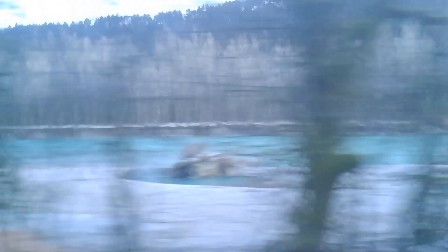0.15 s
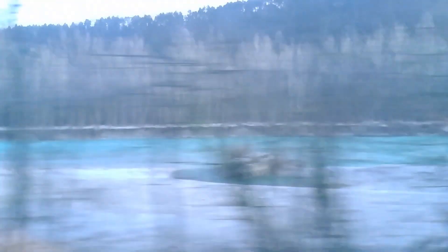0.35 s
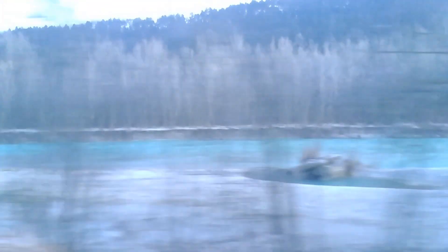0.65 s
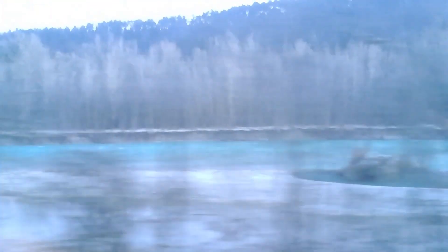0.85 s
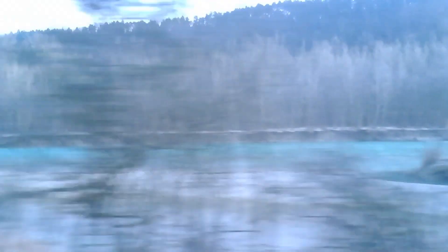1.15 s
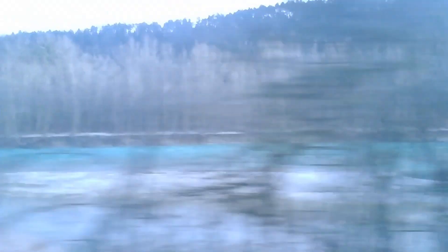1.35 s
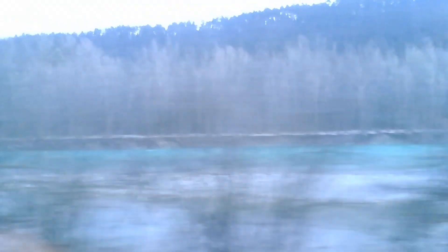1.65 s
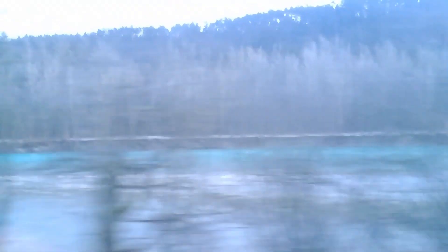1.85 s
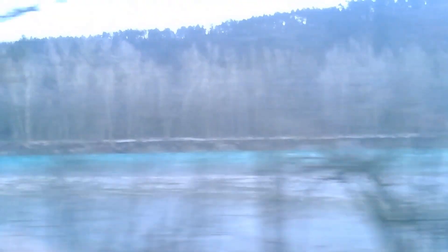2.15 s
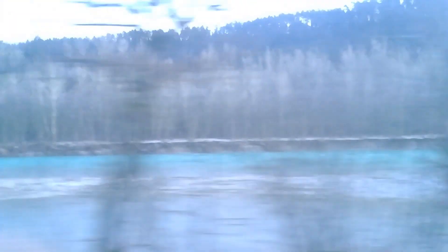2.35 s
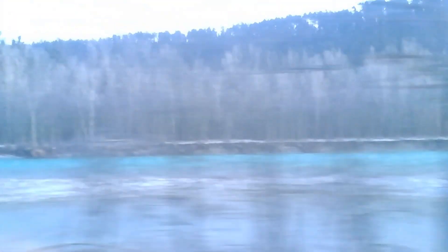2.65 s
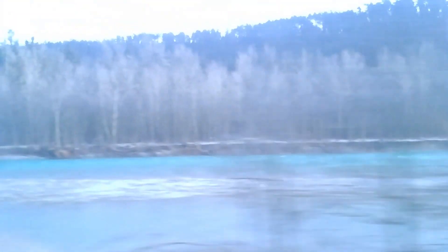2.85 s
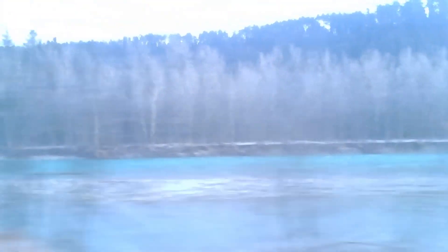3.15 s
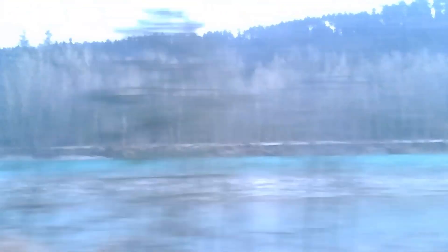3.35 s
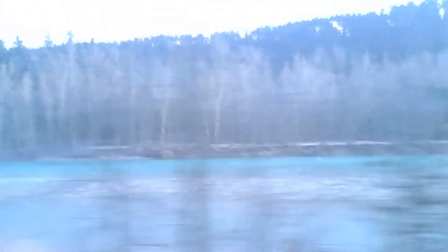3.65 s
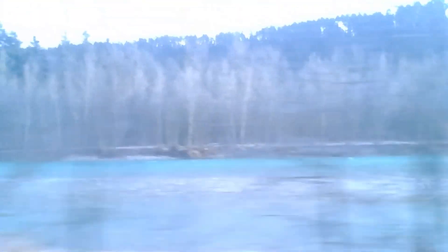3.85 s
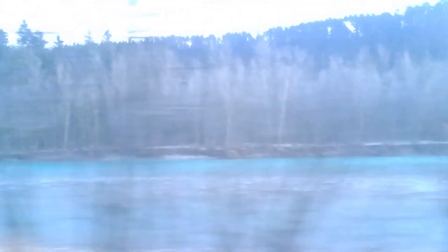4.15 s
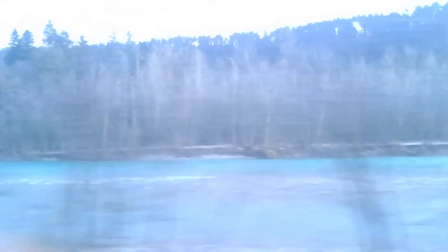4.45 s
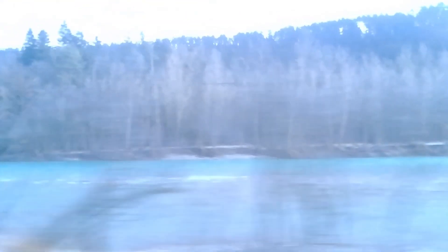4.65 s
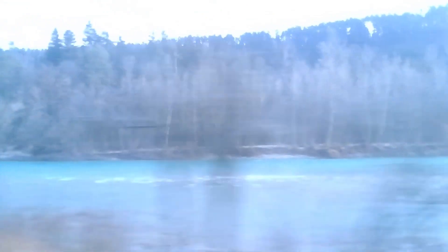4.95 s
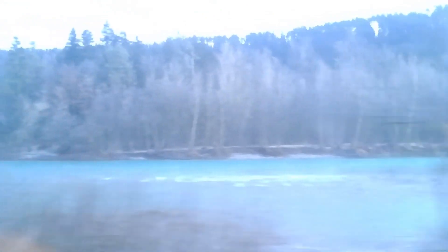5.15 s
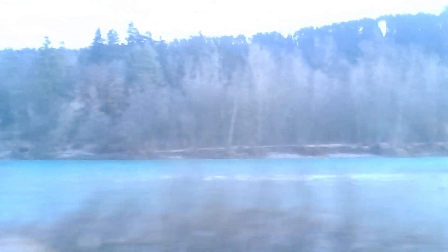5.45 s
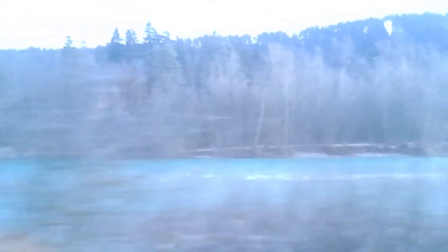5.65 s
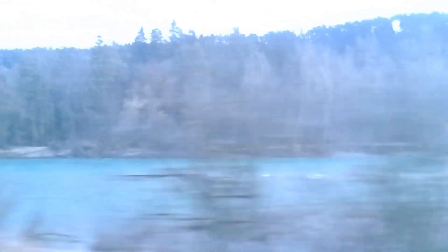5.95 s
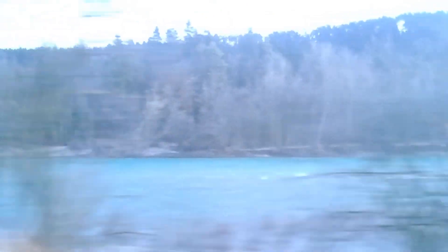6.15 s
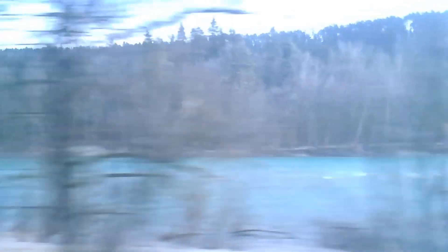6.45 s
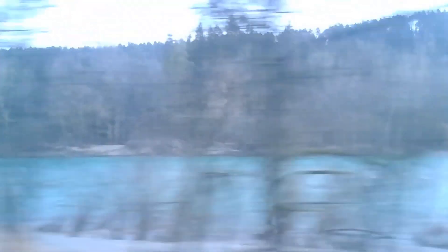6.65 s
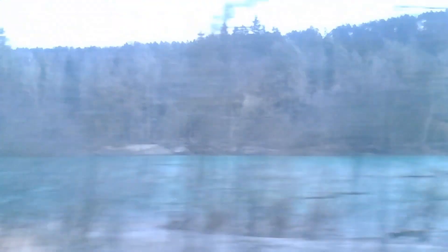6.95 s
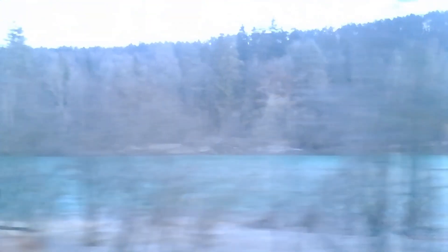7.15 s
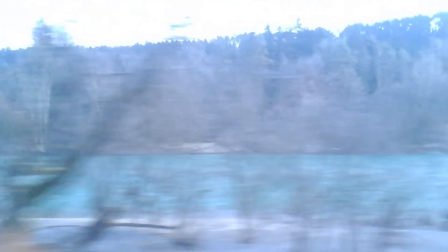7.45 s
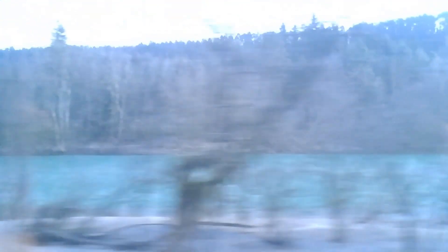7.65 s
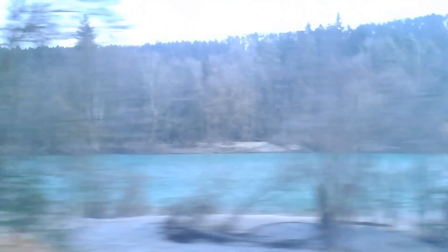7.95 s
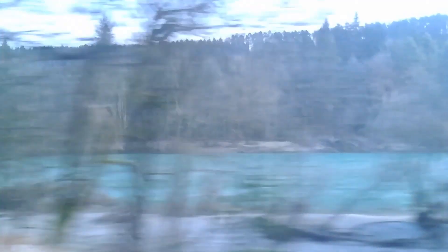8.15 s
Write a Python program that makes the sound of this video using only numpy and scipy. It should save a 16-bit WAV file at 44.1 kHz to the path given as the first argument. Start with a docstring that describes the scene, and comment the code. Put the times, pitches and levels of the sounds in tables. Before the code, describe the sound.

Carriage interior at speed, microphone in the cabin near a window. Bass-heavy continuous hum dominates, slowly beating, with a thin wavering whine that weakens as the train eases off. Gusty air is faint. Dull panel clacks and a tiny metallic rattle pass. Late on, the boom nearly vanishes and partly returns under rougher, fuller rolling noise and engine drone.

```python
"""A carriage boom inside a running train, from out-of-round wheels, beats against an engine drone.
It fades after five seconds and partly returns; wheel-locked tones sink slightly as the train eases off.
Coloured noise makes the rolling roar and rushing air, which swell on rougher track towards the end.
Sine tones make a faint whine, rail singing and panel hums; resonant noise makes two thuds from the track.
Short noise bursts make clacks, rustles and ticks; decaying sines make the knocks of a loose fitting."""
import sys
import numpy as np
from scipy import signal
from scipy.fft import rfft, irfft, next_fast_len
from scipy.io import wavfile
from scipy.ndimage import uniform_filter1d

SR = 44100
rng = np.random.default_rng(int(sys.argv[2]) if len(sys.argv) > 2 else 0)


def unload_wav(signal):
    """Save mono or channel-first audio to the path in sys.argv[1] as 16-bit WAV at rate SR, clipped to [-1, 1]."""
    wavfile.write(
        sys.argv[1],
        SR,
        np.round(np.clip(np.atleast_2d(signal).T, -1, 1) * 32767).astype(np.int16),
    )


N = 365148
TIME = np.arange(N) / SR
CRUISE_TURNS_PER_S = 13.1
ROUGH_FROM_S, ROUGH_FULL_S = 6.05, 6.83


def from_db(db):
    """Decibels to amplitude gain."""
    return 10 ** (np.asarray(db) / 20)


def rms_one(x):
    """Scale to unit power."""
    return x / np.sqrt(np.mean(x ** 2) + 1e-20)


def curve_db(rows):
    """Interpolate (time_s, level_db) rows at every sample."""
    time_s, level_db = np.transpose(rows)
    return np.interp(TIME, time_s, level_db)


def at_hz(points, hz):
    """Interpolate a table on a log-frequency axis."""
    point_hz, value = np.transpose(points)
    return np.interp(np.log(hz), np.log(point_hz), value)


def ramp(start_s, end_s):
    """Linear rise from 0 to 1 between two times."""
    return np.clip((TIME - start_s) / (end_s - start_s), 0, 1)


def bell(center_s, peak_db, sigma_s):
    """Gaussian amplitude envelope."""
    return from_db(peak_db) * np.exp(-0.5 * ((TIME - center_s) / sigma_s) ** 2)


def swells(rows):
    """Sum of bells, one per row."""
    return sum(bell(center_s, peak_db, sigma_s) for center_s, peak_db, sigma_s in rows)


def strikes(rows, attack_s, decay_s):
    """Sum of envelopes: linear attack times exponential decay, one per row."""
    total = 0
    for start_s, level_db in rows:
        attack = np.clip((TIME - start_s) / attack_s, 0, 1)
        decay = np.exp(-np.abs(TIME - start_s) / decay_s)
        total = total + from_db(level_db) * attack * decay
    return total


def drift(rate_hz):
    """Slow unit-power random signal: noise through two equal low-pass poles."""
    step = 40  # computed at SR / 40, then interpolated
    pole = np.exp(-2 * np.pi * rate_hz * step / SR)
    noise = rng.standard_normal(N // step + 2002)
    slow = signal.lfilter([1], [1, -2 * pole, pole * pole], noise)[2000:]  # drop the settling
    return np.interp(np.arange(N) / step, np.arange(len(slow)), rms_one(slow))


def tone(cycles, wander_rad, rate_hz):
    """Unit-power sine on a running cycle count, with random start phase and wandering phase."""
    phase = 2 * np.pi * (cycles + rng.random()) + wander_rad * drift(rate_hz)
    return np.sqrt(2) * np.sin(phase)


def cabin_noise(spectrum):
    """Unit-power stereo noise of a given colour, its sides alike mainly in the bass."""
    # left-right likeness of the diffuse field: frequency_hz, correlation (-1 to 1)
    likeness = [(60, 0.9), (150, 1), (250, 0.79), (500, .52), (1000, -.03), (2000, -0.035), (4000, .12),
                (8000, -0.13)]
    size = next_fast_len(N)
    hz = np.maximum(np.fft.rfftfreq(size, 1 / SR), 1)
    mid, side = rfft(rng.standard_normal((2, size)))
    alike = at_hz(likeness, hz)
    both = np.sqrt(1 + alike) * mid + np.sqrt(1 - alike) * side * [[1], [-1]]
    # skirts beyond the ends of the table
    low_skirt = np.minimum(1, hz / spectrum[0][0]) ** 2
    high_skirt = np.minimum(1, spectrum[-1][0] / hz) ** 4
    shaped = both * low_skirt * high_skirt * from_db(at_hz(spectrum, hz))
    return rms_one(irfft(shaped, size)[:, :N])


def resonant_noise(modes):
    """Noise through parallel resonances, each applied twice for steep skirts."""
    shake = rng.standard_normal(N)
    total = 0
    for hz, width_hz, level_db in modes:
        b, a = signal.iirpeak(hz, hz / width_hz, fs=SR)
        once = signal.lfilter(b, a, shake)
        total = total + from_db(level_db) * rms_one(signal.lfilter(b, a, once))
    return total


def wheels(turns, rough, eased):
    """Tread bumps repeat every turn; order 5 meets the body boom, throbbing once a turn at cruise."""
    # boom of the carriage body: time_s, level_db
    boom_curve = [(0, -15), (2.9, -15), (4.7, -13.5), (5.15, -16.5), (5.38, -24), (5.75, -22), (6.3, -29.5),
                  (6.85, -48.5), (7.35, -27.5), (8.28, -24)]
    # weaker wheel orders: multiple of the turning rate, smooth_track_db, rough_track_db
    wheel_orders = [(2, -47, -51), (3, -40.5, -39.5), (4, -44.5, -40.5), (6, -36, -29), (8, -50.5, -38.5),
                    (9, -54.5, -42), (10, -53.5, -45), (11, -53.5, -50)]
    boom_order, throb_depth, waver_db = 5, 0.22, 1.4
    throb = 1 + throb_depth * (1 - eased) * np.sin(2 * np.pi * turns)
    boom = tone(boom_order * turns, wander_rad=0.025, rate_hz=4.4)
    total = from_db(curve_db(boom_curve)) * throb * boom
    for order, smooth_db, rough_db in wheel_orders:
        level_db = smooth_db + rough * (rough_db - smooth_db) + waver_db * drift(0.98)
        total = total + from_db(level_db) * tone(order * turns, wander_rad=0.59, rate_hz=0.94)
    return total


def rolling(turns, rough):
    """Rail roughness shakes the floor and roars through it, throbbing slightly once a wheel turn."""
    # low shaking of the floor: frequency_hz, relative density_db
    rumble_spectrum = [(18, -29), (30, -14), (42, -8.5), (60, -1), (76, 4), (90, -8), (115, -1), (140, -2),
                       (178, -0.5), (215, -3.5), (240, -14), (300, -30.5)]
    # roar through the floor: frequency_hz, relative density_db
    roar_spectrum = [(170, -25), (245, -7), (290, -1.5), (335, 1), (385, -5.5), (440, -11), (510, -11),
                     (570, -9), (640, -11), (730, -14), (820, -19), (1000, -22.5), (1400, -40.5)]
    throb = 1 + 0.075 * np.sin(2 * np.pi * turns)
    rumble_db = -32.0 + 3.6 * rough + 1.1 * drift(8.9)
    roar_db = -41 + 4.5 * rough
    rumble = from_db(rumble_db) * cabin_noise(rumble_spectrum)
    roar = from_db(roar_db) * cabin_noise(roar_spectrum)
    return throb * (rumble + roar)


def engine():
    """Eight firings a cycle drone; uneven cylinders add a comb of weaker lines around the firing tone."""
    # orders of the engine: multiple of the cycle rate, level_db at 0 dB load
    engine_orders = [(4.5, -41.5), (8, -28), (15, -51.5), (16, -48.5), (17, -42.5), (18, -47), (19, -36.5),
                     (20, -46), (21, -45), (22, -45.5), (23, -47.5), (24, -54), (34.5, -49)]
    # engine load: time_s, gain_db
    load_curve = [(1, -15), (2, -4.5), (3.6, -4.5), (6, -4), (7.4, 0.5)]
    cycle_hz = 9.635
    cycles = cycle_hz * TIME
    lines = 0
    for order, level_db in engine_orders:
        lines = lines + from_db(level_db) * tone(order * cycles, wander_rad=0.2, rate_hz=1.7)
    return from_db(curve_db(load_curve)) * lines


def air_level_db():
    """Air level: a small rise, then a larger one lagging the rough track."""
    base_db, rise_db, rough_rise_db, rough_lag_s = -58, 2.3, 5.5, 0.57
    rise = rise_db * ramp(4.95, 5.5)
    rough_rise = rough_rise_db * ramp(ROUGH_FROM_S + rough_lag_s, ROUGH_FULL_S + rough_lag_s)
    return base_db + rise + rough_rise


def gust_level_db():
    """Gusts each build, hold and drop away."""
    # gusts along the windows: start_s, length_s, rise_db
    gust_rows = [(-.1, 0.22, 4), (0.753, 0.22, 0.5), (1.265, 0.36, 2), (1.78, 0.19, 2), (2.1, 0.19, 1.5),
                 (2.387, 0.4, 1.5), (2.948, 0.46, 4), (3.39, 0.2, 1.5), (3.6, 0.36, 0.5), (4.14, 0.27, 2.5),
                 (4.52, .13, 2), (5.03, 0.13, 1.5), (5.92, 0.29, 1.2), (6.454, .4, 2.4), (6.996, 0.17, 3)]
    attack_s, release_s = 0.05, 0.04
    total_db = 0
    for start_s, length_s, rise_db in gust_rows:
        end_s = start_s + length_s
        held = ramp(start_s, start_s + attack_s) - ramp(end_s, end_s + release_s)
        total_db = total_db + rise_db * held
    return total_db


def air():
    """Air rushes along the windows, fluttering with turbulence; its hiss leans left."""
    # rush: frequency_hz, relative density_db
    rush_spectrum = [(700, -14), (950, -7), (1150, 4), (1480, -2), (1800, 1), (2000, 3), (2180, 0),
                     (2400, -1.5), (2800, -4.5), (3300, -13.5), (4200, -33)]
    # hiss: frequency_hz, relative density_db
    hiss_spectrum = [(2500, -14), (3400, -5.5), (4400, 0), (5200, -8), (6500, -9.5), (7600, -14.5),
                     (9500, -23), (12000, -16.5), (15500, -19.5)]
    hiss_offset_db, hiss_gust_share, hiss_flutter_db = -13, 0.53, 1.1
    air_db = air_level_db() + 1.1 * drift(43)
    gust_db = gust_level_db()
    hiss_db = air_db + hiss_offset_db + hiss_gust_share * gust_db + hiss_flutter_db * drift(40)
    rush = from_db(air_db + gust_db) * cabin_noise(rush_spectrum)
    hiss = from_db(hiss_db) * cabin_noise(hiss_spectrum)
    return rush * from_db([[0.3], [-0.3]]) + hiss * from_db([[0.9], [-0.9]])


def whine(turns, eased):
    """Thin wavering drive tones sink with speed over a low hum; most fade as the train eases off."""
    # drive tones, each with one added swell:
    # cruise_hz, cruise_db, eased_db, swell_center_s, swell_peak_db, swell_sigma_s
    whine_tones = [(487, -56, -72, .25, -57, .2), (535, -70, -64, 2.1, -62, .25),
                   (581, -63, -68, .6, -62, .25), (625, -61, -59.5, 1.9, -60, .4),
                   (636, -61, -66, 1.65, -59, .34), (680, -59, -70, 1.3, -57, .3),
                   (724, -59.5, -65, .8, -55, .14), (784, -68, -78, 1.3, -70, .3),
                   (835, -75, -70, 5.1, -72, .25), (1152, -70, -74, 2.15, -70, .25)]
    hum_order, hum_db, hum_drop_db, flicker_db = 8, -38, 16, 1.6
    hum = from_db(hum_db - hum_drop_db * eased) * tone(hum_order * turns, wander_rad=0.18, rate_hz=5.3)
    thin = 0
    for cruise_hz, cruise_db, eased_db, center_s, swell_db, sigma_s in whine_tones:
        level_db = cruise_db + eased * (eased_db - cruise_db) + flicker_db * drift(2.2)
        level = from_db(level_db) + bell(center_s, swell_db, sigma_s)
        cycles = cruise_hz * turns / CRUISE_TURNS_PER_S
        thin = thin + level * tone(cycles, wander_rad=0.42, rate_hz=2.3)
    return hum + thin


def rail_singing():
    """A faint, broken high tone of the rail climbs, sinks and dies away."""
    top_s, top_hz, glide_hz_per_s = 2.1, 6860, 280
    start_db, hold_until_s, fade_db_per_s = -87.5, 3.3, 15
    hz = top_hz - glide_hz_per_s * np.abs(TIME - top_s)
    level_db = start_db - fade_db_per_s * np.maximum(TIME - hold_until_s, 0) + 2.2 * drift(15)
    return from_db(level_db) * tone(np.cumsum(hz) / SR, wander_rad=2.2, rate_hz=35)


def clacks():
    """Dull clacks of the panelling: short mid-band noise bursts."""
    # clacks: start_s, level_db before the envelope
    clack_rows = [(.16, -48), (1.241, -48), (1.841, -44), (2.325, -46), (3.146, -46), (4.56, -48),
                  (6.945, -42), (7.16, -43)]
    # their colour: frequency_hz, relative density_db
    clack_spectrum = [(650, -11.5), (950, 2), (1300, 2), (1700, -9.5), (2400, -19.5)]
    return strikes(clack_rows, attack_s=0.005, decay_s=0.011) * cabin_noise(clack_spectrum)


def rustles():
    """Soft rubbing in the cabin: swells of noise with a grainy level."""
    # rubs: center_s, peak_db before the grain, sigma_s
    rustle_rows = [(.9, -67.5, 0.056), (1.345, -63, 0.027), (1.49, -66.5, 0.062), (2.33, -65.5, 0.13),
                   (3.315, -59.5, 0.021), (6.045, -66, 0.024), (6.94, -63, 0.025), (7.2, -64, .012),
                   (7.324, -55.5, 0.015), (7.43, -62, 0.024), (7.68, -62, .02)]
    # their colour: frequency_hz, relative density_db
    rustle_spectrum = [(1200, -14), (2500, 1.5), (3800, 1.5), (5000, -2), (6600, -6.5), (8500, -22.5),
                       (12000, -26.5)]
    grain = from_db(1.7 * drift(90))
    return swells(rustle_rows) * grain * cabin_noise(rustle_spectrum)


def thuds():
    """Wheels over a dip in the track jolt the floor into its resonances."""
    # floor resonances: frequency_hz, width_hz of one filter pass, relative level_db
    floor_modes = [(136, 26, -14), (178, 28, 0), (205, 50, -11), (285, 92, -15)]
    # jolts: center_s, peak_db, sigma_s
    thud_rows = [(2.108, -22.5, .025), (6.654, -26.5, .011), (6.693, -21, .017)]
    ringing = resonant_noise(floor_modes)
    # level the noise over 660 samples (15 ms) so the envelope sets the strength
    even = ringing / np.sqrt(uniform_filter1d(ringing ** 2, size=660) + 1e-9)
    return even * swells(thud_rows)


def panels():
    """The shaking sets wall panels humming; each hum wavers, swells and fades."""
    # hums: pitch_hz, center_s, peak_db before the waver, sigma_s
    hum_rows = [(309, 3, -51.5, 0.25), (336, 4.05, -47.5, 0.25), (333, 6.51, -44.5, 0.22),
                (307.4, 7.7, -43, 0.48)]
    total = 0
    for hz, center_s, peak_db, sigma_s in hum_rows:
        level = bell(center_s, peak_db, sigma_s) * from_db(2 * drift(10))
        total = total + level * tone(hz * TIME, wander_rad=0.93, rate_hz=3.2)
    return total


def ticks():
    """Small dry ticks of the trim: very short treble noise bursts."""
    # ticks: start_s, level_db before the envelope
    tick_rows = [(3.185, -55), (7.183, -61), (7.292, -47)]
    # their colour: frequency_hz, relative density_db
    tick_spectrum = [(3000, -14), (4200, -1), (5100, 3), (6400, -2), (7600, -15), (12000, -32)]
    return strikes(tick_rows, attack_s=0.0005, decay_s=0.0036) * cabin_noise(tick_spectrum)


def fitting():
    """Knocks ring the decaying modes of a loose metal fitting, each mode with a random strength."""
    # modes: frequency_hz, relative level_db, t60_s
    fitting_modes = [(2480, 2, .09), (2700, 1, .11), (2990, -2, .1), (3210, -3, .14), (3410, -2, .19),
                     (3655, -1, .24), (4120, -2, .1), (4400, -3, .07), (6600, -11, .06)]
    # knocks: start_s, level_db before the mode levels
    knock_rows = [(3.295, -63.5), (3.311, -62.5), (3.326, -62), (6.039, -64.5)]
    spread_db = 2
    total = 0
    for start_s, knock_db in knock_rows:
        age_s = np.maximum(TIME - start_s, 0)
        for hz, mode_db, t60_s in fitting_modes:
            level_db = knock_db + mode_db + rng.normal(0, spread_db)
            decay = np.exp(-np.log(1000) * age_s / t60_s)
            total = total + from_db(level_db) * decay * np.sin(2 * np.pi * hz * age_s)
    return total


def scene():
    """Body-borne sounds reach the right side first; noise fills the cabin; small sounds join on top."""
    ease_off_s, slowing_turns_per_s2, left_lag_s = 2.35, 0.182, 0.00041
    speed = CRUISE_TURNS_PER_S - slowing_turns_per_s2 * np.maximum(TIME - ease_off_s, 0)
    turns = np.cumsum(speed) / SR
    rough = ramp(ROUGH_FROM_S, ROUGH_FULL_S)
    eased = ramp(1.9, 3.6)  # fade of the throb and the drive tones
    body = wheels(turns, rough, eased) + engine() + whine(turns, eased) + thuds() + panels()
    left = np.interp(TIME - left_lag_s, TIME, body)
    body_stereo = np.array([left, body]) * from_db([[-0.25], [0.25]])
    cabin = clacks() + rustles() + ticks() + fitting()
    return body_stereo + rolling(turns, rough) + air() + rail_singing() + cabin


def record(dry):
    """A steep elliptic low-pass cuts the top."""
    cutoff_hz, ripple_db, stop_db = 15700, 0.1, 80
    return signal.sosfilt(signal.ellip(10, ripple_db, stop_db, cutoff_hz, fs=SR, output="sos"), dry)


dry = scene()
out = record(dry)
unload_wav(out)
```